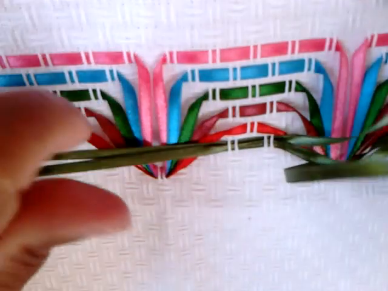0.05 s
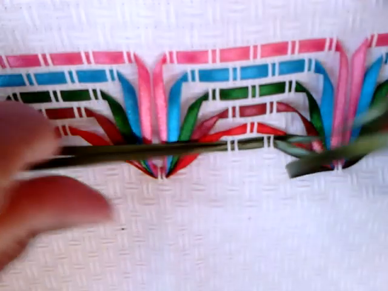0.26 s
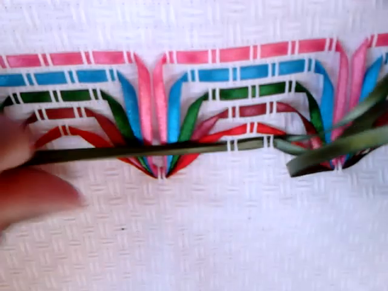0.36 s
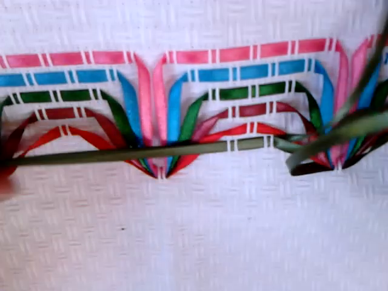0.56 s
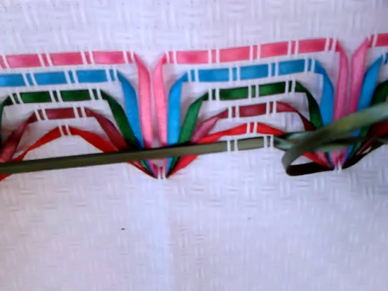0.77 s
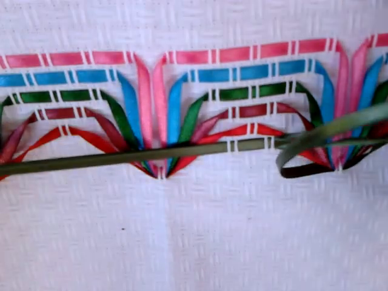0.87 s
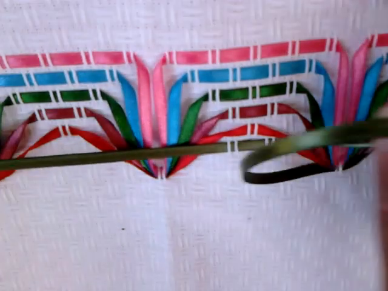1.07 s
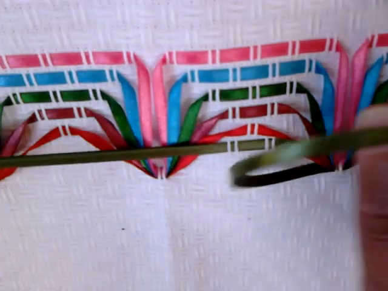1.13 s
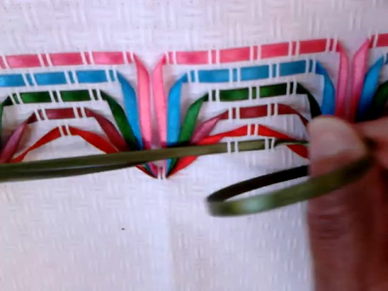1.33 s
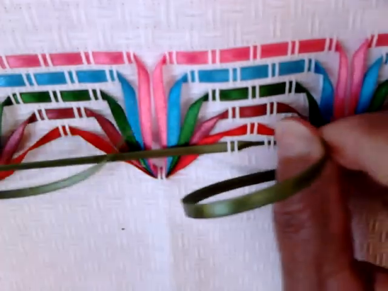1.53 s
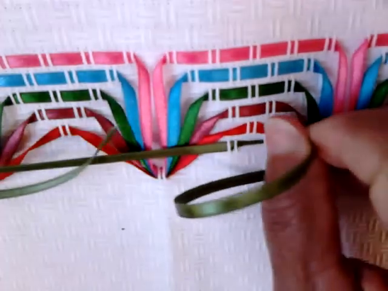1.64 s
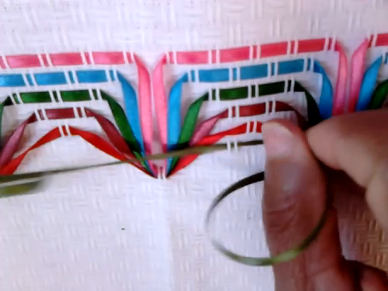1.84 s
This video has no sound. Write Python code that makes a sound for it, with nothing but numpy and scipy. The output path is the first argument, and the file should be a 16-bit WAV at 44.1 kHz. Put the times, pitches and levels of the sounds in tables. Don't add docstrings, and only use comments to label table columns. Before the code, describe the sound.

Satin ribbon pulled through woven cloth, jerky ticking snaps, then a dense rustling scrape, close up

```python
import sys
import numpy as np
from scipy import signal
from scipy.fft import rfft, irfft, next_fast_len
from scipy.io import wavfile
from scipy.ndimage import uniform_filter1d, map_coordinates

SR = 44100
rng = np.random.default_rng(int(sys.argv[2]) if len(sys.argv) > 2 else 0)


def unload_audio(sound):
    columns = np.transpose(np.atleast_2d(sound))
    steps = np.round(np.clip(columns, -1, 1) * 32767)
    wavfile.write(sys.argv[1], SR, steps.astype(np.int16))


def gain_from_db(level_db):
    decades = np.asarray(level_db, float) / 20
    return 10 ** decades


N = 83790

# frequency [Hz], density [dB per Hz].
ROOM_SPECTRUM = [(15, -27), (35, -14), (60, -0.5), (82, -8), (150, -3), (300, -16), (1500, -31.5),
                 (14200, -37.5)]
# frequency [Hz], width [Hz], level [dB].
TABLE_MODES = [(61.1, 20, 0.5), (128, 12.2, 2), (153.9, 16, -3), (183.14, 13, -1.5), (230.3, 22, -10),
               (308.5, 36, -8), (361.4, 120, -13), (569.5, 28, -15)]
# frequency [Hz], width [Hz], level [dB].
CLOTH_MODES = [(953, 117, -12), (1946, 227, -12.5), (3284, 220, -14), (4180, 350, -13.5),
               (5980, 1200, -17.5), (7160, 695, -8), (9180, 970, -5), (10490, 850, -3), (11350, 3800, -14)]
# frequency [Hz], width [Hz], level [dB].
SHEET_MODES = [(3363, 1000, 1), (4760, 2200, -0.5)]
# frequency [Hz], width [Hz], level [dB].
RIB_MODES = [(9410, 1380, 3), (12700, 3700, -19.5), (6840, 720, -14.5)]
# frequency [Hz], width [Hz], level [dB].
FINGER_MODES = [(1970, 4600, -9.5), (5430, 2400, 0), (9340, 2200, 3), (12300, 3000, -5.5)]
# time [s], sliding strength [dB], drag on the table [dB], slack of the cloth [dB].
PULL_COURSE = [(0, -65, -67, -6), (0.049, -78.5, -70.5, -15), (0.137, -79, -67.5, -3),
               (0.189, -61, -54, -4), (0.246, -41.5, -41.5, -10.5), (0.303, -40, -38.5, -13),
               (0.399, -51.5, -47, -7), (0.442, -41.5, -43, -8), (0.466, -56, -56, -12),
               (0.523, -37.5, -41.5, -14), (0.576, -38.5, -42.5, -4.5), (0.612, -33.5, -42.5, -5.5),
               (0.698, -36.5, -46.5, -9), (0.801, -35.5, -47, -9.5), (0.863, -40.5, -41.5, -19),
               (0.908, -51.5, -50, -23), (0.979, -73.5, -71, -12.5), (1.9, -81.5, -76, -17)]
# start [s], tick [dB], cloth flap [dB], rustle relative to tick [dB], flap pitch [Hz].
RIB_SNAPS = [(0.1476, -31, -39.5, -20.5, 4960), (0.1577, -34.5, -43, -20, 5230),
             (0.162, -34.5, -39, -18, 4996), (0.203, -27.5, -37, -17.5, 4900),
             (0.2113, -27, -42.5, -15, 4770), (0.2402, -30, -48, -13.5, 5600),
             (0.2623, -31, -37, -27, 5900), (0.2735, -26.5, -40, -22, 6600), (0.2902, -20, -28, -28, 6250),
             (0.314, -43, -33, -26, 5350), (0.3495, -19.5, -28.5, -18, 4930),
             (0.3625, -33.5, -41, -8, 5700), (0.363, -29.5, -35, -24, 5200),
             (0.3802, -34.5, -40, -6.5, 5100), (0.3894, -35, -37.5, -27, 5010),
             (0.41, -32.5, -36, -13, 4950), (0.4272, -36, -46, -18, 4560), (0.4778, -33, -38.5, -21, 5050),
             (0.4807, -34, -50, -9.5, 5000), (0.505, -33, -39.5, -20, 4860), (0.6845, -23, -32, -12, 3840),
             (0.706, -14, -30.5, -32, 4960), (0.8674, -33.5, -53, -20.5, 6800),
             (1.3717, -28.5, -39, -15.5, 4330), (1.8293, -33, -70, -21.5, 5000)]
# start [s], level [dB], pitch [Hz], T60 [s].
NEEDLE_RING = (1.3885, -50, 1540, .035)
# start [s], bright puff [dB], cloth flap [dB], flap pitch [Hz].
RIBBON_SLIPS = [(0.2546, -33.5, -47, 6182), (0.433, -35, -45, 6276), (0.448, -37, -56, 4855),
                (0.5138, -37, -52, 5211), (0.5196, -41.5, -51, 3624), (0.5306, -27, -53, 4784),
                (0.535, -43, -32, 4855), (0.5477, -34, -29, 4760), (0.5532, -34, -55, 4879),
                (0.559, -31, -34, 5045), (0.5653, -44, -43, 4689), (0.5678, -34.5, -35, 4832),
                (0.585, -32.5, -33, 4784), (0.59, -30, -26, 4832), (0.5944, -32.5, -32, 5139),
                (0.6058, -35, -22.5, 3695), (0.6096, -27, -26.5, 4358), (0.622, -40, -36, 4310),
                (0.6344, -33, -20, 3695), (0.644, -35, -47, 4595), (0.651, -30, -30, 3552),
                (0.6647, -30, -41, 4737), (0.7237, -34, -28, 3813), (0.7258, -29, -35, 3576),
                (0.7364, -51, -54, 3695), (0.7407, -36, -45, 5021), (0.7503, -36, -53, 3789),
                (0.7588, -29.5, -39, 6371), (0.7681, -28, -33, 3647), (0.7742, -27.5, -28.5, 3576),
                (0.7877, -29.5, -29.5, 5187), (0.7958, -31.5, -37, 4808), (0.802, -42, -53, 4737),
                (0.8082, -30, -34, 3624), (0.8397, -30.5, -42, 4950), (0.8456, -33, -50, 3671),
                (0.8543, -41, -52, 3789), (0.8578, -45, -60, 4689)]
# start [s], push [dB], thud pitch [Hz], bright brush [dB], dull brush [dB].
FINGER_BUMPS = [(0, -52, 146.6, -61.5, -59.5), (0.1, -51, 147.5, -63, -61),
                (0.146, -42, 59.7, -56.5, -50.5), (0.934, -52.5, 90.3, -62, -66),
                (1.0397, -36.5, 112.4, -45.5, -53), (1.087, -45.5, 118.8, -56.5, -60.5),
                (1.162, -47.5, 132, -60, -63), (1.373, -44.5, 128, -45.5, -54.5),
                (1.529, -55, 61.3, -73.5, -71), (1.572, -58, 127.6, -83, -75), (1.645, -45, 51.9, -60, -53),
                (1.871, -58, 151, -59, -72.5), (1.828, -51.5, 170.4, -57, -64.5)]
# peak time [s], pitch [Hz], level [dB], length [s].
TABLE_SWAYS = [(0.268, 183, -44, 0.052), (0.276, 354.7, -52.5, 0.055), (0.284, 58.8, -46.5, 0.06),
               (0.291, 135.6, -40.5, 0.052), (0.317, 124, -43, 0.084), (0.335, 178, -45, 0.06),
               (0.52, 221.4, -49.5, 0.053), (0.55, 118, -38, 0.04), (0.557, 58.95, -52.5, 0.071),
               (0.564, 234.8, -49.5, 0.067), (0.567, 187.5, -41, 0.045), (0.62, 236, -46.5, 0.033),
               (0.634, 537, -62, 0.06), (0.669, 234, -51, 0.055), (0.674, 66.3, -48.5, 0.031),
               (0.682, 151.9, -42, 0.06), (0.687, 582, -60.5, 0.07), (0.744, 562.6, -57, 0.042),
               (0.761, 118.3, -44, 0.049), (0.781, 65, -44, 0.067), (0.81, 183.2, -48, 0.047),
               (0.878, 186.4, -50, 0.039), (0.886, 129.4, -50, 0.076), (0.896, 70, -50.5, 0.041)]
# peak time [s], pitch [Hz], level [dB], length [s].
FURTHER_SWAYS = [(.005, 515, -66.5, .015), (0.154, 55.3, -52.5, 0.031), (0.183, 320, -63, 0.059),
                 (0.222, 130.5, -51.5, .04), (0.36, 185, -52.5, 0.039), (0.432, 128, -54, 0.057),
                 (0.518, 186.8, -47.5, 0.037), (.625, 190.4, -49.5, 0.11), (1.524, 824, -77.5, .14),
                 (1.657, 129.8, -49.5, 0.011), (0.417, 348.2, -58.5, 0.063), (1.374, 590, -66, 0.023),
                 (1.656, 366, -63.5, 0.014), (1.683, 377.4, -63.5, 0.011), (1.835, 348, -63, 0.012)]
# frequency [Hz], readiness [no unit].
APART_READINESS = [(3500, -1), (4500, -1.75), (6500, -0.43), (9000, -0.05), (13000, -0.1), (15000, 0.5)]
# start [s], end [s].
ALIKE_SPANS_S = [
    (.125, .15),
    (.195, .225),
    (.26, .295),
    (.345, .425),
    (1.35, 1.395),
    (1.815, 1.855),
]

SLIDE, DRAG, SLACK = 1, 2, 3
ROOM_DB, BETWEEN_DB = -69, -28
STEADY_DRAG_DB, EVEN_SLIDE_DB = -4.5, -1.5
SHAKE_DB, EVEN_S = -6.5, 0.09
BRUSH_RISE_S, BRUSH_T60_S, DULL_HZ = 0.0032, 0.14, 410
THUD_CYCLES, RING_DB = 0.45, -5
FLAP_DROP, FLAP_LAG_S, FLAP_RISE_S, FLAP_T60_S = 0.261, 0.0008, 0.00079, 0.01
PUFF_RISE_S, PUFF_T60_S, PUFF_DB, SLIP_FLAP_DB = 0.0016, 0.023, 1, 5
TICK_T60_S, ECHO_S, ECHO_DB, RUSTLE_T60_S = 0.0067, 0.0024, -16.5, 0.1
GRAINS_PER_S, GRAIN_SPREAD_DB, GRAIN_T60_S, SMOOTH_DB = 1400, 5, 0.007, 6
CRACKLES_PER_S, CRACKLE_HZ = 900, 4483
TOP_HZ, OFFSET, STEP = 14250, -0.0011, 1 / 1024


def unit(x):
    return x / np.sqrt(np.mean(np.abs(x) ** 2) + 1e-20)


def along(points, hz):
    f, v = np.transpose(points)
    return np.interp(np.log(hz + 1), np.log(f + 1), v)


def wobble(knots_per_s):
    knots = rng.standard_normal(int(N * knots_per_s / SR) + 4)
    return map_coordinates(knots, [np.arange(N) * knots_per_s / SR])


def dying(t60_s, size):
    return gain_from_db(-60 * np.arange(size) / SR / t60_s)


def add_at(track, start_s, burst):
    track[round(start_s * SR):][:len(burst)] += burst


def filtered(x, response):
    m = next_fast_len(N + SR // 2)
    return irfft(rfft(x, m) * response(np.fft.rfftfreq(m, 1 / SR)), m)[..., :N]


def resonant(modes):
    def response(f):
        total = 0
        for k, (hz, width, db) in enumerate(modes):
            total = total + (-1) ** k * gain_from_db(db) * 1j * f * width / (hz * hz - f * f + 1j * f * width)
        return total
    return response


def cloth(x):
    def response(f):
        return resonant(CLOTH_MODES)(f) + gain_from_db(BETWEEN_DB) * 1j * f / (300 + 1j * f)
    gain = np.sqrt(np.mean(np.abs(response(np.linspace(0, TOP_HZ, num=999))) ** 2))
    return filtered(x, response) / gain


def sheet(x):
    return filtered(x, lambda f: (1j * f / (2600 + 1j * f)) ** 2 * resonant(SHEET_MODES)(f))


def flap(hz, size):
    t = np.arange(size) / SR
    pitch_hz = hz * (1 - FLAP_DROP * (1 - np.exp(-t / 0.002)))
    roughness = np.cumsum(0.27 * rng.standard_normal(size))
    wave = np.sin(2 * np.pi * np.cumsum(pitch_hz) / SR + roughness)
    return wave * dying(FLAP_T60_S, size) * (1 - np.exp(-t / FLAP_RISE_S))


def pull(column):
    rows = np.transpose(PULL_COURSE)
    return np.interp(np.arange(N) / SR, rows[0], rows[column])


def room():
    noise = filtered(rng.standard_normal(N), lambda hz: gain_from_db(along(ROOM_SPECTRUM, hz)))
    return gain_from_db(ROOM_DB + 0.9 * wobble(14)) * unit(noise)


def sways():
    t = np.arange(N) / SR
    total = np.zeros(N)
    for peak_s, hz, db, length_s in ALL_SWAYS():
        swell = np.exp(-2 * ((t - peak_s) / length_s) ** 2)
        total += gain_from_db(db) * swell * np.sin(2 * np.pi * hz * t)
    return total


def ALL_SWAYS():
    return list(TABLE_SWAYS) + list(FURTHER_SWAYS)


def finger_bumps():
    pushes, bright, dull = np.zeros((3, N + SR))
    t = np.arange(SR // 5) / SR
    brush = (1 - np.exp(-t / BRUSH_RISE_S)) * dying(BRUSH_T60_S, len(t))
    for s, push_db, hz, bright_db, dull_db in FINGER_BUMPS:
        u = hz * t / THUD_CYCLES
        push = u * np.exp(1 - u) * np.sin(2 * np.pi * hz * t)
        add_at(pushes, s, -gain_from_db(push_db) * push)
        add_at(bright, s, gain_from_db(bright_db) * brush * rng.standard_normal(len(t)))
        add_at(dull, s, gain_from_db(dull_db + 11.5) * brush * rng.standard_normal(len(t)))

    def dull_response(f):
        broad = 1j * f / (150 + 1j * f) / (1 + 1j * f / DULL_HZ)
        return broad + gain_from_db(12.0) * resonant(TABLE_MODES[4:])(f)

    thuds = pushes[:N] + gain_from_db(RING_DB) * filtered(pushes[:N], resonant(TABLE_MODES))
    scuffs = filtered(dull[:N], dull_response)
    return thuds + scuffs + gain_from_db(1.5) * filtered(bright[:N], resonant(FINGER_MODES))


def evened(x):
    return x / np.sqrt(np.abs(uniform_filter1d(x ** 2, size=round(EVEN_S * SR))) + 1e-12)


def drag():
    lumps = gain_from_db(2.1 * wobble(70)) * rng.standard_normal(N)
    shaking = filtered(lumps, lambda f: 1j * f / (30 + 1j * f) / (1 + 1j * f / 180) ** 2)
    total = gain_from_db(SHAKE_DB) * evened(shaking)
    for hz, width, db in TABLE_MODES:
        narrow, wide = resonant([(hz, width, 0)]), resonant([(hz, 4 * width, 0)])
        total = total + gain_from_db(db) * evened(filtered(lumps, lambda f: narrow(f) * wide(f)))
    return gain_from_db(pull(DRAG)) * evened(total)


def slips():
    puffs, flaps = np.zeros((2, N))
    size = 1200
    rise = 1 - np.exp(-np.arange(size) / SR / PUFF_RISE_S)
    shape = rise * dying(PUFF_T60_S, size)
    for s, puff_db, flap_db, hz in RIBBON_SLIPS:
        add_at(puffs, s, gain_from_db(puff_db + PUFF_DB) * shape * rng.standard_normal(size))
        add_at(flaps, s, gain_from_db(flap_db + SLIP_FLAP_DB) * flap(hz, size))
    return cloth(puffs) + sheet(flaps)


def needle(size):
    _, db, hz, t60_s = NEEDLE_RING
    t = np.arange(size) / SR
    drift = np.cumsum(0.06 * rng.standard_normal(size))
    ring = np.sin(2 * np.pi * hz * t + drift)
    return gain_from_db(db) * ring * dying(t60_s, size) * (1 - np.exp(-t / 0.00055))


def snaps():
    ticks, rustles, flaps = np.zeros((3, N + SR))
    size = SR // 8
    tick_shape = dying(TICK_T60_S, size) * (1 - dying(0.0016, size))
    for s, tick_db, flap_db, rustle_db, hz in RIB_SNAPS:
        a, b = rng.standard_normal((2, size))
        tick = tick_shape * np.sign(a)
        echo = gain_from_db(ECHO_DB) * np.roll(tick, round(ECHO_S * SR)) * np.sign(b)
        add_at(ticks, s, gain_from_db(tick_db + 8) * (tick + echo))
        add_at(rustles, s, gain_from_db(tick_db + rustle_db) * b * dying(RUSTLE_T60_S, size))
        add_at(flaps, s + FLAP_LAG_S, gain_from_db(flap_db + 9.0) * flap(hz, size))
    flapping = sheet(flaps[:N])
    add_at(flapping, NEEDLE_RING[0], needle(size))
    return filtered(ticks[:N], resonant(RIB_MODES)) + cloth(rustles[:N]) + flapping


def crackling():
    total = np.zeros(N)
    for k in range(6):
        hits = rng.random(N) < CRACKLES_PER_S / SR / 6
        strikes = hits * gain_from_db(2.6 * rng.exponential(size=N).clip(0, 3))
        wave = flap(CRACKLE_HZ * np.exp(0.12 * (k - 1.6)), size=700)
        total += signal.fftconvolve(strikes, wave)[:N]
    return unit(sheet(total))


def sliding():
    hits = rng.random(N) < GRAINS_PER_S / SR
    strengths_db = GRAIN_SPREAD_DB * rng.exponential(size=N).clip(0, 3) + 1.7 * wobble(60.4)
    envelope = signal.fftconvolve(hits * gain_from_db(strengths_db), dying(GRAIN_T60_S, size=600))[:N]
    grains = unit(envelope * rng.standard_normal(N))
    hiss = gain_from_db(SMOOTH_DB + 1.6 * wobble(50)) * rng.standard_normal(N)
    rustle = cloth(unit(grains + hiss))
    return gain_from_db(pull(SLIDE)) * (rustle + gain_from_db(pull(SLACK) - 3.5) * crackling())


def scene():
    background = room() + sways() + finger_bumps()
    ribbon = gain_from_db(STEADY_DRAG_DB) * drag() + slips() + snaps() + gain_from_db(EVEN_SLIDE_DB) * sliding()
    sound = background + ribbon
    return np.array([sound, sound])


def low_pass(x):
    return signal.sosfilt(signal.butter(12, 15590, fs=SR, output="sos"), x)


def record(dry):
    dry = STEP * np.round((dry + OFFSET) / STEP)
    hz, t, z = signal.stft(dry[0], SR, nperseg=1024)
    band = (np.log(hz + 1) * 9).astype(int)
    draws = rng.standard_normal((band.max() + 1, len(t) // 4 + 1))
    chance = np.repeat(draws, 4, axis=1)[band, :len(t)]
    apart = 1 / (1 + np.exp(12 * (chance - along(APART_READINESS, hz)[:, None])))
    for start_s, end_s in ALIKE_SPANS_S:
        apart = apart * ((t < start_s) | (t > end_s))
    level = np.sqrt(np.abs(uniform_filter1d(np.abs(z) ** 2, size=9, axis=0)))
    noise = unit(signal.stft(rng.standard_normal(N), nperseg=1024)[2])
    side_bands = noise * level * apart * (hz > 4250)[:, None]
    side = signal.istft(side_bands, nperseg=1024)[1][:N]
    pair = filtered(dry + np.array([side, -side]), lambda f: 1 / (1 + (f / TOP_HZ) ** 200))
    return low_pass(pair)


dry = scene()
out = record(dry)
unload_audio(out)
```